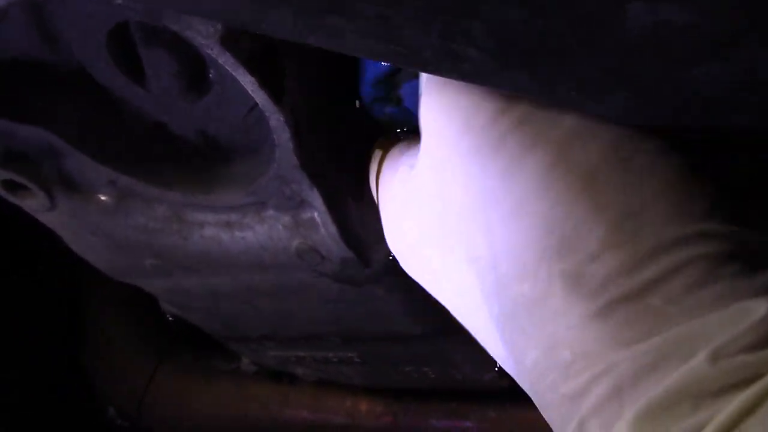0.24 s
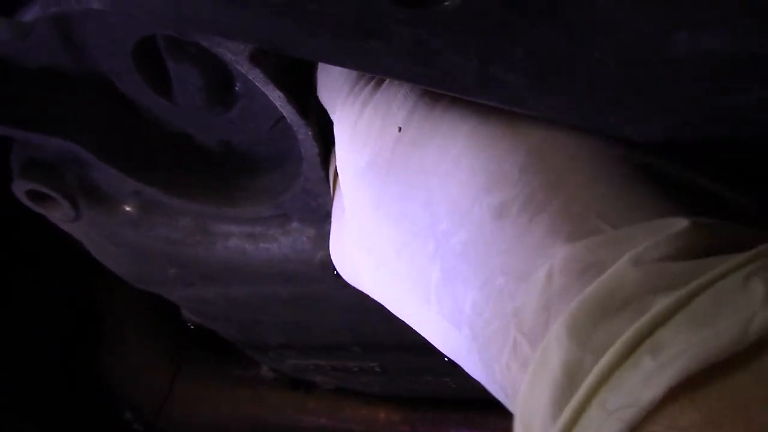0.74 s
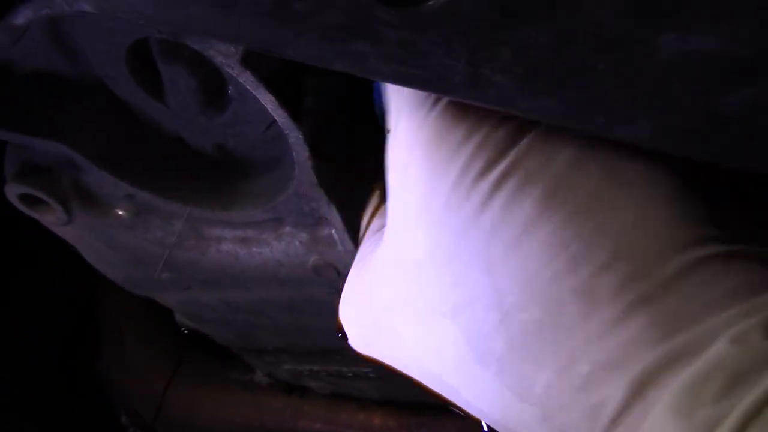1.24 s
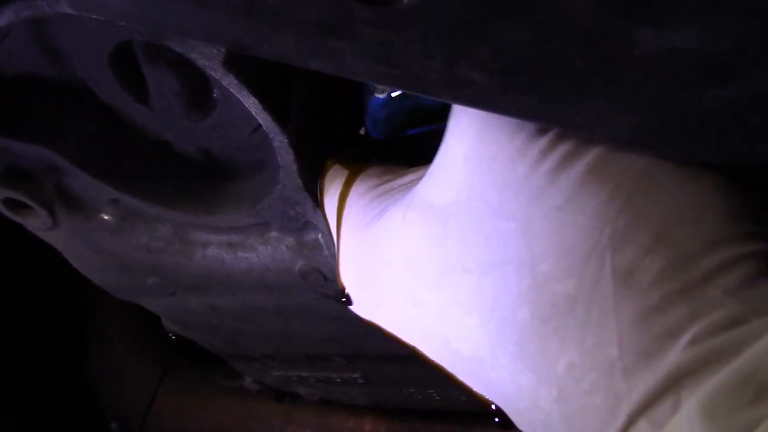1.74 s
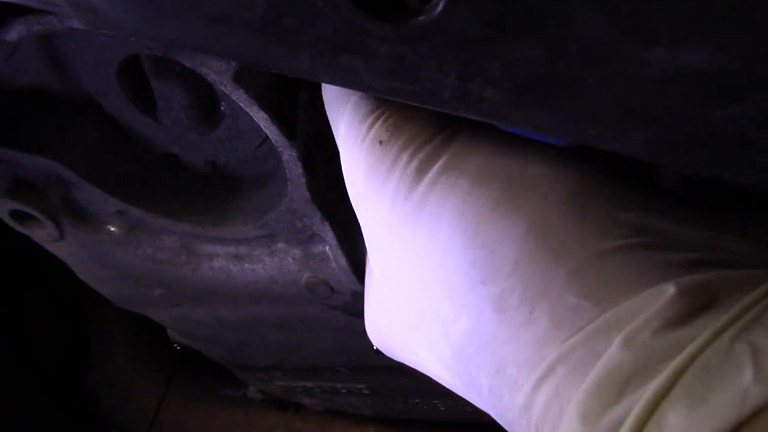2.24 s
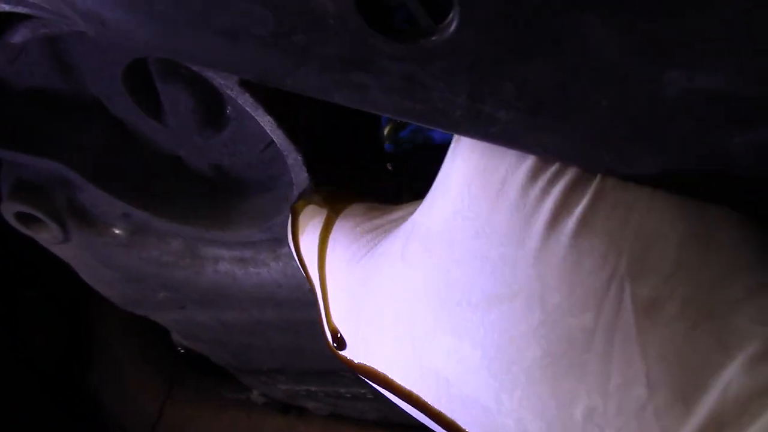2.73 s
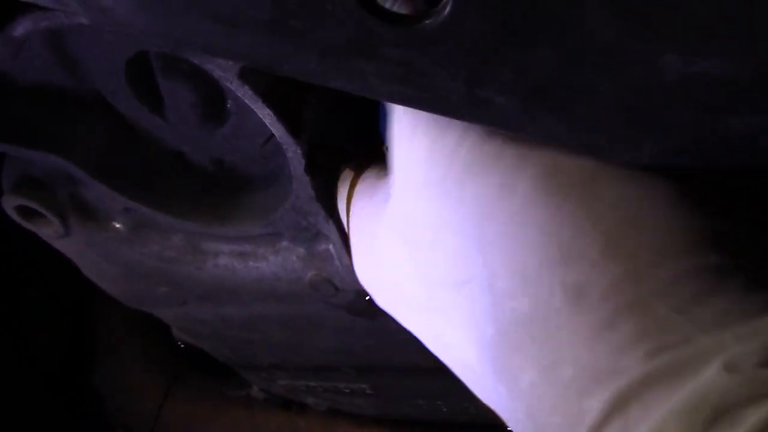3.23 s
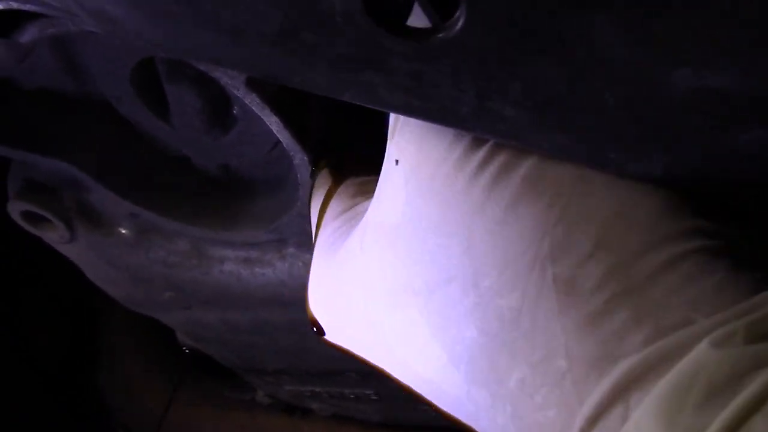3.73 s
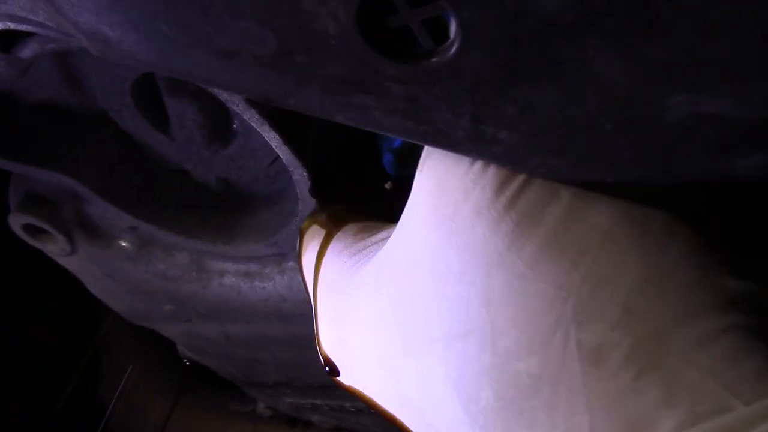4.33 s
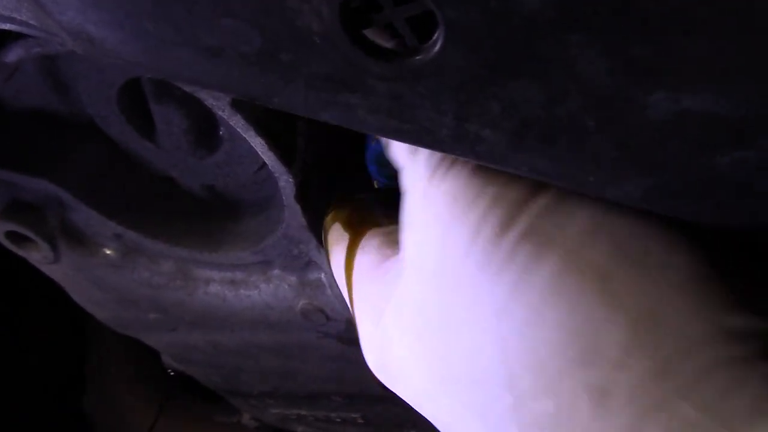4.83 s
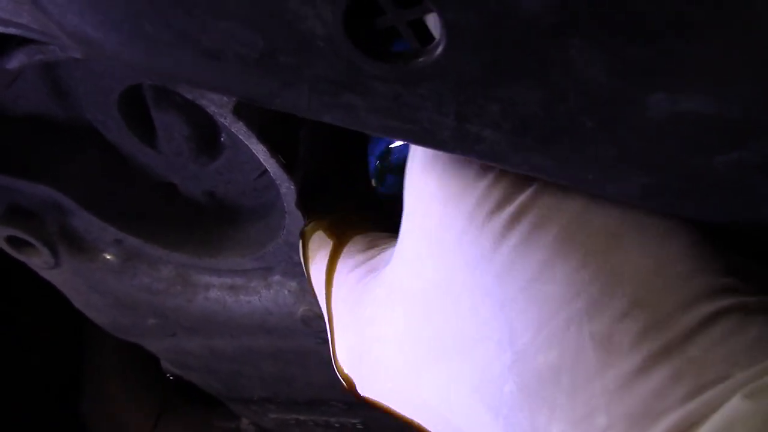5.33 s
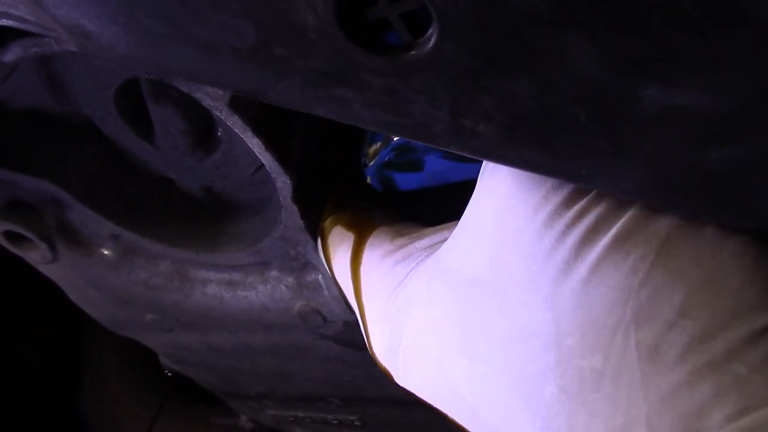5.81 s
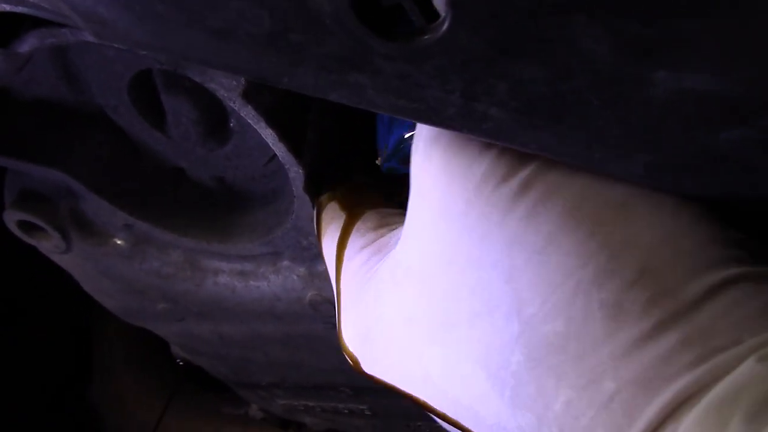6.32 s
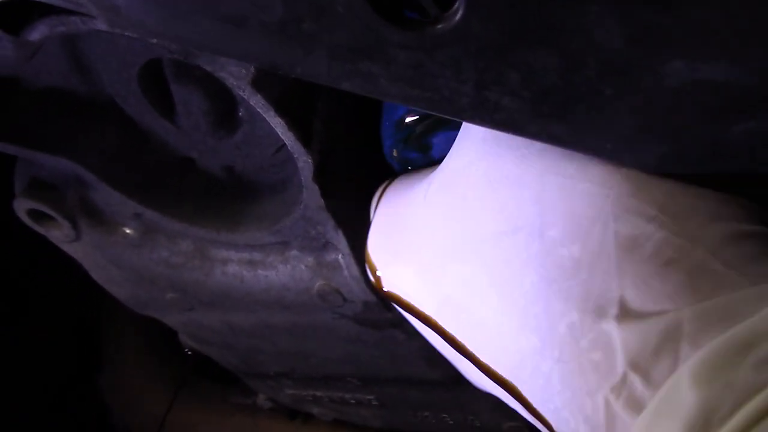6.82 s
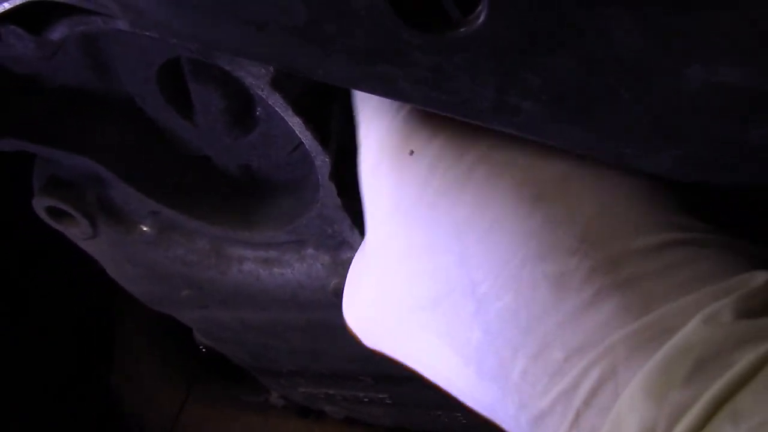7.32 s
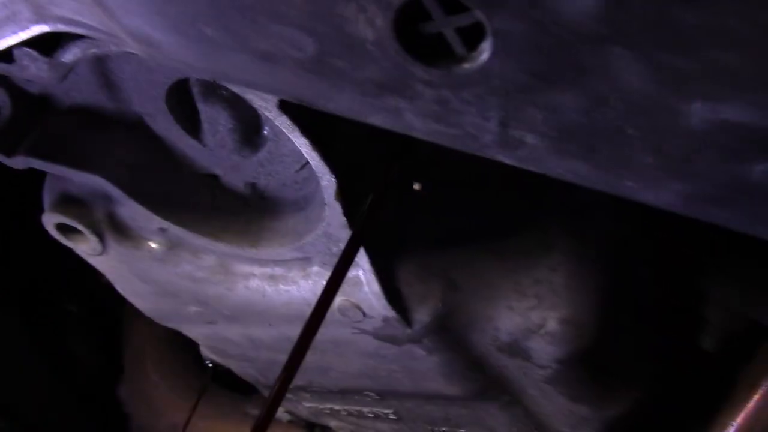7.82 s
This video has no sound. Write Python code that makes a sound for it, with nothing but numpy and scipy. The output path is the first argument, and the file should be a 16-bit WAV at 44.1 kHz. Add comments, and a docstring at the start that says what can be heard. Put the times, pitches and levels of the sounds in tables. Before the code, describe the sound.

Under a car in a garage, oil falls in a dense, uneven patter into a drain pan: round plops, fizzing droplets and tiny ticks. A gloved hand unscrewing the filter adds soft thuds, rough cracks and brief rubs. Knocks cluster early and grow strongest near the end. Low air rumble and light hiss lie beneath, with a distant bird's falling whistles. The microphone is close, the sound centred.

```python
"""Under a car in a garage, oil drips from a filter that a gloved hand unscrews and patters into a drain pan.
Loud drops, and the ringing and clicking parts of the hand's knocks, are short bubble-like tones through the pan.
Many smaller drops plop, fizz and tick; the knocks add low thuds and rough cracks that ring the filter can.
Rubs are bands of noise, air rumbles at the microphone, hiss and a thin tone lie below,
and a far bird lets its whistles fall."""
import sys
import numpy as np
from scipy import signal
from scipy.io import wavfile
from scipy.ndimage import uniform_filter1d

SR = 44100
rng = np.random.default_rng(int(sys.argv[2]) if len(sys.argv) > 2 else 0)


def wrap_up_sound(samples):
    """Save the sound to the file named by the first command line argument, as 16-bit audio."""
    columns = np.atleast_2d(samples).T
    # keep every value between -1 and 1, then stretch to whole-number steps
    tamed = np.clip(columns, -1, 1)
    steps = np.round(tamed * 32767).astype(np.int16)
    wavfile.write(sys.argv[1], SR, steps)


N = 355446  # length in samples

# All levels below hold before the final stage, record(), which lifts quiet sounds by about 2 dB.
# loud drops, and the ringing and clicking parts of the hand's knocks:
# (time [s], peak level [dB], pitch [Hz])
DROPS_AND_KNOCKS = [(0.058, -22.5, 2500), (0.093, -24, 2510), (0.102, -25, 1760), (0.1152, -30, 4400),
                    (0.191, -25, 1620), (0.245, -25, 4830), (0.3142, -18, 1764), (0.3303, -26, 4810),
                    (0.4074, -23.5, 1590), (0.481, -24, 1740), (0.4813, -30, 4460), (0.485, -29.5, 3050),
                    (0.5624, -22, 1670), (0.6097, -24, 8390), (0.6122, -16.5, 1630), (0.6355, -17.5, 10240),
                    (0.6798, -21.5, 1710), (0.7095, -15.5, 1720), (0.79, -19, 1730), (0.7914, -26, 5500),
                    (0.7913, -18.5, 8630), (0.8737, -26.5, 4650), (0.8732, -19, 1660),
                    (0.9243, -18.5, 1690), (0.953, -18, 1406), (0.984, -30, 2200), (0.9893, -19.5, 1540),
                    (1.044, -26, 9900), (1.058, -21.5, 5780), (1.104, -24.5, 5780), (1.2204, -26, 5960),
                    (1.2472, -28, 5600), (1.281, -15.5, 1550), (1.3303, -21.5, 1660), (1.3336, -21, 2430),
                    (1.406, -27, 1760), (1.4237, -22.5, 1720), (1.4264, -27.5, 4300), (1.427, -27, 2700),
                    (1.4933, -16.1, 1830), (1.4959, -23.5, 2330), (1.778, -24, 1240), (1.803, -33, 880),
                    (1.8332, -20.5, 5800), (1.8355, -26, 6800), (1.9668, -28, 2450), (1.9686, -22, 1545),
                    (1.9693, -21, 5400), (1.969, -20, 7500), (2.003, -12, 1600), (2.0976, -27, 6000),
                    (2.0983, -19.5, 7100), (2.1478, -28, 11500), (2.162, -15.5, 1675), (2.2268, -20, 1464),
                    (2.3425, -24, 1490), (2.4135, -24.5, 2660), (2.449, -18, 1710), (2.5037, -24.5, 3920),
                    (2.5161, -13.5, 1454), (2.5278, -27, 5720), (2.5318, -35, 8000), (2.56, -26.5, 10540),
                    (2.589, -20, 2590), (2.6065, -24, 4570), (2.6099, -22.3, 2720), (2.661, -31, 1470),
                    (2.7308, -31.5, 5700), (2.7414, -30, 1550), (2.7763, -21, 1900), (2.838, -20.5, 4360),
                    (2.898, -21.5, 1600), (3.001, -22.5, 1500), (3.0235, -27, 11500), (3.04, -21, 2830),
                    (3.048, -23, 5330), (3.1065, -20, 1535), (3.1146, -27.5, 8800), (3.1327, -28, 5550),
                    (3.133, -17, 1430), (3.135, -24.5, 2640), (3.185, -24.5, 2570), (3.2033, -27, 8200),
                    (3.2196, -18, 1780), (3.225, -21, 5470), (3.2847, -26.5, 8860), (3.298, -21.8, 1850),
                    (3.3222, -17.5, 1630), (3.4679, -15.5, 1480), (3.4842, -28.2, 9500), (3.507, -18, 1770),
                    (3.5084, -23.5, 2520), (3.53, -21.5, 5500), (3.5295, -24, 7040), (3.54, -24.5, 1013),
                    (3.5558, -21, 7960), (3.5948, -18, 1830), (3.623, -30.5, 1030), (3.6284, -19.5, 2000),
                    (3.641, -27.5, 4500), (3.7195, -23, 1960), (3.818, -14, 1510), (3.8285, -19, 12600),
                    (3.858, -26.5, 7960), (3.9121, -20.5, 1710), (3.923, -20, 4950), (3.9242, -18.5, 1400),
                    (3.93, -32, 1030), (3.9316, -29, 9870), (3.9889, -21, 1830), (3.994, -23.9, 2330),
                    (4.0326, -19, 2550), (4.0598, -26, 2530), (4.0666, -14.5, 1700), (4.1239, -22, 1550),
                    (4.1306, -25, 4330), (4.1434, -30, 10280), (4.152, -24, 1520), (4.1585, -18, 2510),
                    (4.1796, -26.5, 3880), (4.1812, -28, 2660), (4.231, -29, 4230), (4.2302, -17.5, 1570),
                    (4.2637, -14.5, 1640), (4.263, -25, 4360), (4.3163, -17, 10140), (4.3812, -32, 4480),
                    (4.4146, -21, 1770), (4.4347, -18, 1460), (4.4477, -33, 7850), (4.4575, -17, 1770),
                    (4.4805, -20, 1510), (4.5071, -16, 1830), (4.579, -33, 5760), (4.594, -24.5, 9800),
                    (4.7056, -23, 1530), (4.7139, -21, 2580), (4.7695, -24.9, 4660), (4.781, -18.5, 1400),
                    (4.7899, -28.5, 9000), (4.93, -23, 1720), (5.0161, -15.5, 1735), (5.0431, -21.5, 1775),
                    (5.3026, -24, 4820), (5.346, -31, 7000), (5.3773, -23.5, 1260), (5.3975, -27, 5000),
                    (5.5257, -23, 2650), (5.5504, -21, 1455), (5.63, -17, 1640), (5.69, -21.5, 1470),
                    (5.7716, -24, 5400), (5.8605, -21.5, 1700), (5.9132, -18.0, 1920), (5.917, -29, 5230),
                    (5.9727, -17, 1900), (5.9897, -31.5, 5650), (6.0764, -20.5, 1734), (6.2, -26, 6660),
                    (6.2094, -16.5, 1670), (6.221, -31, 4230), (6.2535, -18.5, 1810), (6.271, -22.5, 2480),
                    (6.3774, -17.8, 1910), (6.3958, -28, 5800), (6.3968, -19.5, 8660), (6.4601, -30, 5730),
                    (6.4917, -28.5, 4250), (6.5462, -16, 1384), (6.5777, -11.5, 1626), (6.5805, -29, 2250),
                    (6.6227, -18, 1660), (6.6265, -20.5, 2540), (6.6471, -27, 5760), (6.6629, -19, 1710),
                    (6.7194, -28, 5800), (6.7703, -13, 1870), (6.806, -21.5, 1870), (6.809, -28, 2600),
                    (6.8656, -25.3, 7590), (6.93, -19, 8160), (6.9482, -17, 1870), (7.0329, -20, 1680),
                    (7.1104, -20.2, 2370), (7.226, -20, 1690), (7.2537, -16, 1460), (7.267, -29, 3080),
                    (7.28, -28.5, 7850), (7.314, -21, 1830), (7.3238, -27, 2590), (7.3634, -3.5, 1270),
                    (7.3649, -19.5, 2300), (7.4644, -21, 1790), (7.4897, -15.5, 1710), (7.4937, -27, 2610),
                    (7.522, -30, 4470), (7.5382, -18.5, 1443), (7.552, -19.5, 1850), (7.5623, -27, 5630),
                    (7.5927, -29, 10070), (7.6208, -23, 1490), (7.6429, -23, 9100), (7.6507, -21.5, 2180),
                    (7.6511, -6, 1447), (7.6947, -24, 5500), (7.709, -25, 2560), (7.7475, -20.8, 1860),
                    (7.8026, -14.5, 1890), (7.9186, -20.5, 1820), (7.9263, -28, 5830), (7.9567, -19, 1830),
                    (7.9597, -24.1, 2370), (7.961, -24, 4100), (7.977, -13, 1246), (7.9773, -13, 2250),
                    (8.024, -17, 2500), (8.025, -15, 5900), (8.0249, -15.5, 6900), (8.0245, -21, 1390)]
# the pan and the hollow under the car: (pitch [Hz], relative level [dB], time to fade by 60 dB [s])
PAN_MODES = [(906, 14, 0.037), (1030, 1.5, 0.043), (1200, 2, 0.097), (1399, 4.5, 0.1), (1490, 6.5, 0.028),
             (1540, -1, 0.099), (1634, 9.5, 0.037), (1710, 12.5, 0.021), (1830, 11, 0.045), (1946, 6, 0.1),
             (1970, -8, 0.094), (2200, -0.5, 0.049), (2330, 13.5, 0.019), (2624, 8.5, 0.014),
             (2582, 5, 0.12), (2780, -1.5, 0.053), (3142, 0, 0.047), (4520, 0, 0.039), (4680, 2, 0.07),
             (5420, -10, 0.033), (5564, 10, 0.016), (5780, -1.5, 0.086), (6015, 6.5, 0.021)]
# the crowd of small drops: (time [s], guiding level [dB])
PATTER_LEVELS = [(0.0, -32.5), (0.43, -36.5), (0.85, -35), (1.03, -32.5), (1.34, -35), (1.71, -39.5),
                 (2.33, -35.5), (2.94, -37.5), (3.34, -33.5), (3.57, -37.5), (4.6, -35), (4.96, -38),
                 (5.79, -39.5), (6.89, -33.5), (7.18, -37.5), (7.43, -34.5), (7.81, -39.5), (8.06, -33)]
# bumps of the hand and the filter:
# (time [s], crack peak [dB], crack time to fade by 60 dB [s], thud peak [dB], thud pitch [Hz])
HAND_BUMPS = [(0.18, -29.5, 0.13, -22.5, 183), (0.565, -14.5, 0.07, -12, 232), (0.612, -11, 0.049, -9, 204),
              (0.792, -23.5, 0.055, -21, 192), (1.288, -26, .028, -25, 175),
              (1.349, -21, 0.033, -27.5, 169), (1.553, -24, .028, -21, 175),
              (1.778, -21.5, 0.066, -35, 202), (1.97, -10.5, 0.052, -12.5, 253),
              (2.005, -18, 0.082, -20, 151), (2.462, -24, 0.077, -19, 230), (2.936, -36, .03, -24, 230),
              (3.251, -28, .03, -20, 195), (4.153, -28, .03, -24, 219), (4.842, -31, .03, -20.5, 203),
              (5.295, -28, 0.039, -28, 204), (5.35, -20, 0.04, -47, 149), (6.588, -20.5, 0.11, -21, 216),
              (6.928, -17.5, 0.071, -21, 240), (7.363, -12, 0.13, -14, 226),
              (7.539, -16.5, 0.043, -35, 380), (7.651, -18, 0.051, -19, 200), (7.756, -19, 0.03, -33, 300),
              (7.852, -21, 0.022, -27, 139), (7.915, -23, 0.12, -15.5, 430),
              (7.977, -13.5, 0.059, -37.5, 480), (8.027, -9, 0.044, -25, 437)]
# the filter can and its seat: (pitch [Hz], relative level [dB], time to fade by 60 dB [s])
CAN_MODES = [(533, -8, 0.3), (624, -20, 0.093), (732, 0, 0.15), (901, -1, 0.27), (958, -3, 0.31),
             (1037, 3.5, 0.091), (1200, 8, 0.1), (1210, 0, 0.05), (1530, 1.5, 0.13), (1770, 12, .07),
             (2140, 11, 0.055), (2830, 3.5, 0.056)]
# the glove and the thread rub: (start [s], end [s], centre [Hz], width [Hz], level [dB])
GLOVE_RUBS = [(1.86, 1.971, 1200, 86, -37.5), (2.355, 2.44, 3800, 2000, -43), (3.61, 3.913, 2430, 74, -47),
              (4.993, 5.153, 4200, 560, -44.5), (6.444, 6.514, 3970, 960, -42.5),
              (7.443, 7.618, 3830, 15, -46.5)]
# air moving at the microphone: (time [s], level of the deep part [dB], level of the upper part [dB])
RUMBLE_LEVELS = [(0.0, -25.5, -36.5), (0.43, -25, -38.5), (0.83, -20.5, -40.5), (0.99, -22.5, -29),
                 (2.02, -23, -49.5), (2.47, -22.5, -35), (2.8, -24, -45), (3.21, -21, -39),
                 (3.43, -24, -36.5), (3.79, -22.5, -42), (4.04, -26, -44.5), (4.42, -23.5, -37.5),
                 (4.89, -27.5, -44.5), (5.39, -21.5, -36.5), (5.63, -24.5, -44), (6.24, -25.5, -46),
                 (6.82, -23, -39.5), (7.18, -23.5, -45.5), (7.56, -24, -33), (8.06, -21, -37)]
# how the rumble spreads over pitch: (frequency [Hz], relative level [dB per Hz])
RUMBLE_SPECTRUM = [(4.7, -3), (8.0, -1.5), (27, 4), (49, 4), (67, -4.5), (141, -18.5), (222, -22.5),
                   (349, -31), (519, -31), (600, -51), (780, -38), (1320, -120)]
# how the hiss spreads over pitch: (frequency [Hz], relative level [dB per Hz])
HISS_SPECTRUM = [(90, -36), (200, -10), (330, -0.5), (450, 7), (1000, 0), (2000, -11), (3400, -4),
                 (5600, -10.5), (6800, -10.5), (11700, -11), (16000, -17)]
# falling whistles of the bird, level before its path to the listener:
# (start [s], end [s], first pitch [Hz], last pitch [Hz], middle level [dB])
BIRD_WHISTLES = [(-.02, 0.497, 4030, 1854, -43), (4.305, 4.863, 4070, 1837, -42),
                 (5.045, 5.377, 1970, 1142, -42), (5.122, 5.669, 3800, 1844, -42.5),
                 (6.005, 6.493, 3720, 2055, -47)]

TONE_CYCLES, CYCLES_SPREAD = 5.61, 0.19  # cycles until a tone fades to about a third, give or take this share
FINE_HZ = 3000  # above this pitch the second tone is weaker and the tick softer
THUD_CYCLES = 0.85  # a thud fades to about a third in this many cycles
BODY_HZ, BODY_DB, BODY_CYCLES = 83.3, -2.5, 1.27  # each thud also shakes the microphone's housing
RING_SHARE, RING_T60_S = 0.14, 0.054  # a crack this long gives the can this share; longer ones ring it far more
LUMP_DB, LUMP_S = 1.77, 0.039  # depth of the lumps in the deep air noise, and the smoothing that sets their length
HISS_DB = -45.5
WHINE_HZ, WHINE_DB = 12022, -65  # a thin steady electrical tone
EDGE_HZ = 15900  # the sound ends above this frequency


def gain_of(db):
    """Turns dB into a plain gain."""
    return 10 ** (np.asarray(db) / 20)


def evened(x):
    """Scales to an average (rms) level of 1."""
    return x / np.sqrt(np.mean(x ** 2) + 1e-20)


def peaked(db, x):
    """Scales to a peak level."""
    return gain_of(db) * x / abs(x).max()


def add(mix, s, sound):
    """Mixes a sound in at time s, cutting off what falls outside."""
    at = round(s * SR)
    sound = sound[max(-at, 0):]
    part = mix[max(at, 0):][:len(sound)]
    part += sound[:len(part)]


def drifting(width):
    """Slow random wandering: noise smoothed twice over this many samples."""
    once = uniform_filter1d(rng.standard_normal(N), width)
    return evened(uniform_filter1d(once, width))


def fading_modes(modes, t, lift_db):
    """Sums the tones at which a body rings, each fading at its own rate."""
    return sum(gain_of(db + lift - 60 * t / t60) * np.sin(2 * np.pi * hz * t)
               for (hz, db, t60), lift in zip(modes, lift_db))


def noise(spectrum, size):
    """Steady noise from random short-time spectra, shaped on a log-frequency axis."""
    hop = size // 4
    hz = np.fft.rfftfreq(size, 1 / SR)
    f, value = np.transpose(spectrum)
    level_db = np.interp(np.log(hz + 1), np.log(f + 1), value)[:, None]
    a, b = rng.standard_normal((2, len(hz), N // hop + 5))
    return signal.istft((a + 1j * b) * gain_of(level_db), nperseg=size, noverlap=size - hop)[1][:N]


def bubble(hz, cycles, rise=0.093, tick=1.0):
    """A landing tick, then a tone that dies in a few cycles and climbs, as of a bubble nearing the surface."""
    turns = np.arange(3000) / SR * hz
    cycles = max(cycles, .3)
    bent = turns * (1 + rise * np.minimum(turns / cycles, 3) / 2)
    swell = 1 - np.exp(-turns / .7)
    tone = np.sin(2 * np.pi * bent) * np.exp(-turns / cycles) * swell
    click = np.diff(turns == 0, prepend=0.)  # one sample up, one down
    return tone + tick * click


def pan_response(direct_db=14.0, scatter_db=2.0, scatter_t60=0.041, spot_db=8.0, ring_db=-22.5, dull_hz=11900.0):
    """For one spot: straight path, the modes it favours, and a short scattered tail from the metal overhead."""
    t = np.arange(5000) / SR
    favour_db = spot_db * rng.standard_normal(len(PAN_MODES))
    rings = fading_modes(PAN_MODES, t, favour_db)
    scatter_band = signal.butter(1, [1500.0, 9000.0], "bandpass", fs=SR)
    scatter = signal.lfilter(*scatter_band, rng.standard_normal(len(t)))
    tail = scatter * gain_of(scatter_db - 60 * t / scatter_t60)
    whole = gain_of(ring_db) * rings + tail + gain_of(direct_db) * (t == 0)
    return signal.lfilter(*signal.butter(2, dull_hz, fs=SR), whole)


def drops_and_knock_parts(spots, second_db=-8.5):
    """Each drop or knock part is a short tone through the pan; a weaker, mostly higher one follows 7 to 21 ms later."""
    out = np.zeros(N)
    chances = rng.random((len(DROPS_AND_KNOCKS), 5))
    for (s, db, hz), (late, small, where, climb, long) in zip(DROPS_AND_KNOCKS, chances):
        pan = spots[int(where * len(spots))]
        cycles = TONE_CYCLES * (1 + CYCLES_SPREAD * (2 * long - 1))
        fine_db = -4.0 * np.log2(max(hz / FINE_HZ, 1))
        first = bubble(hz, cycles, rise=0.142 * climb, tick=1.2 * gain_of(fine_db))
        add(out, s, peaked(db, signal.fftconvolve(first, pan)))
        after = bubble(hz * (.9 + 0.305 * small), 1.37 * cycles, rise=0.218 * climb, tick=0)
        after_db = db + second_db + fine_db - 3.4 * small
        add(out, s + 0.0066 + 0.014 * late, peaked(after_db, signal.fftconvolve(after, pan)))
    return out


def droplets(spots, lo_hz, hi_hz, per_s, cycles, spread_db):
    """Chance drops at 16 pitches, a few of them much louder, each ringing the pan."""
    out = np.zeros(N)
    for k, hz in enumerate(np.geomspace(lo_hz, hi_hz, 16)):
        lands = rng.random(N) < per_s / 16 / SR
        size = gain_of(spread_db * np.minimum(rng.exponential(1, N), 4)) * lands
        splash = signal.fftconvolve(bubble(hz, cycles, tick=0.9), spots[k % len(spots)])
        out += signal.oaconvolve(size, splash)[:N]
    return evened(out)


def patter(spots):
    """Middle-sized drops plop; smaller ones fizz and tick in clumps."""
    level_db = np.interp(np.arange(N) / SR, *np.transpose(PATTER_LEVELS))
    plops = droplets(spots, 1201, 2685, per_s=450, cycles=7.64, spread_db=4.5)
    ticks = droplets(spots, 3560, 16000, per_s=450, cycles=1.2, spread_db=4.5)
    fizz = droplets(spots, 2710, 5400, per_s=300, cycles=3.5, spread_db=5.5)
    clumps = drifting(2000)
    plops_and_fizz = plops + gain_of(-13.5 + 2.3 * clumps) * fizz
    # the ticks follow the guiding level only weakly
    tick_db = 0.29 * level_db - 37.0 + 3.55 * clumps
    return gain_of(level_db) * plops_and_fizz + gain_of(tick_db) * ticks


def bumps(dull_hz=2200.0):
    """A low push with no ring, and a rough dull crack, part of which sets the can sounding."""
    t = np.arange(12000) / SR
    can = fading_modes(CAN_MODES, t, np.zeros(len(CAN_MODES)))
    out = np.zeros(N)
    soft = signal.butter(2, [250.0, dull_hz], "bandpass", fs=SR)
    grits = rng.standard_normal((len(HAND_BUMPS), 6000))
    for (s, db, t60, thud_db, hz), grit in zip(HAND_BUMPS, grits):
        add(out, s, peaked(thud_db, bubble(hz, THUD_CYCLES, rise=0, tick=0)))
        add(out, s, peaked(thud_db + BODY_DB, bubble(BODY_HZ, BODY_CYCLES, rise=0, tick=0)))
        crack = signal.lfilter(*soft, grit) * gain_of(-60 * t[:6000] / max(t60, .003))
        add(out, s, peaked(db, crack))
        ring_share = RING_SHARE * (t60 / RING_T60_S) ** 2
        add(out, s, ring_share * peaked(db, signal.fftconvolve(crack, can)))
    return out


def rubs():
    """Noise in one resonance: a wide one gives a breathy scrape, a narrow one a thin squeak."""
    out = np.zeros(N)
    for s0, s1, hz, width, db in GLOVE_RUBS:
        band = signal.butter(1, [hz - width / 2, hz + width / 2], "bandpass", fs=SR)
        x = signal.lfilter(*band, rng.standard_normal(SR))[-round((s1 - s0) * SR):]
        add(out, s0, gain_of(db) * evened(x) * signal.windows.tukey(len(x), .6))
    return out


def rumble():
    """Moving air as low noise; its deep part is lumpy, and deep and upper parts swell each in their own way."""
    s, deep_db, upper_db = np.transpose(RUMBLE_LEVELS)
    x = noise(RUMBLE_SPECTRUM, size=4096)
    # level out chance swells first, so that the table sets the loudness
    steady = x / np.sqrt(uniform_filter1d(x ** 2, 9000) + 0.36 * np.mean(x ** 2))
    hz, t, z = signal.stft(steady, SR, nperseg=2048)
    upper_share = np.clip(np.log2((hz + 1) / 70) / 1.17, 0, 1)[:, None]  # blends from 70 to about 157 Hz
    deep = evened(signal.istft(z * (1 - upper_share), SR, nperseg=2048)[1][:N])
    upper = evened(signal.istft(z * upper_share, SR, nperseg=2048)[1][:N])
    lumps_db = LUMP_DB * drifting(round(LUMP_S * SR))
    now = np.arange(N) / SR
    deep_gain = gain_of(np.interp(now, s, deep_db) + lumps_db)
    return deep * deep_gain + upper * gain_of(np.interp(now, s, upper_db))


def bird():
    """Hoarse whistles that slide down evenly in pitch and swell, heard mostly as echoes off walls."""
    out = np.zeros(N)
    for s0, s1, first_hz, last_hz, db in BIRD_WHISTLES:
        hz = np.geomspace(first_hz, last_hz, round((s1 - s0) * SR))
        # hoarseness: pitch and loudness both waver at random
        tremble, flutter = (evened(uniform_filter1d(v, 500)) for v in rng.standard_normal((2, len(hz))))
        shape_db = db + 5.0 * np.linspace(-1, 1, len(hz)) + 3.5 * flutter
        tone = np.sin(2 * np.pi * np.cumsum(hz * (1 + .014 * tremble)) / SR)
        add(out, s0, gain_of(shape_db) * tone * signal.windows.tukey(len(hz), .3))
    t = np.arange(8000) / SR
    echoes = rng.standard_normal(len(t)) * gain_of(-60 * t / .22)
    echoed = signal.oaconvolve(out, echoes / np.linalg.norm(echoes))[:N]
    return gain_of(-7) * out + echoed


def hiss():
    """Garage air and microphone noise as steady shaped noise, with the thin tone."""
    tone = np.sin(2 * np.pi * WHINE_HZ * np.arange(N) / SR)
    air = evened(noise(HISS_SPECTRUM, size=512))
    return gain_of(HISS_DB) * air + gain_of(WHINE_DB) * tone


def scene():
    """All sources reach both channels alike; eight spots of the pan each answer in their own way."""
    spots = [pan_response() for spot in range(8)]
    mono = drops_and_knock_parts(spots) + patter(spots) + bumps() + rubs() + rumble() + bird() + hiss()
    return np.array([mono, mono])


def record(dry):
    """A small boost with soft overload on the loudest blows, then the band limit."""
    held = 1.374 * np.tanh(dry / 1.077)
    low_pass = signal.firwin(511, EDGE_HZ, window=("kaiser", 9), fs=SR)
    return signal.oaconvolve(held, low_pass[None], "same")


dry = scene()
out = record(dry)
wrap_up_sound(out)
```